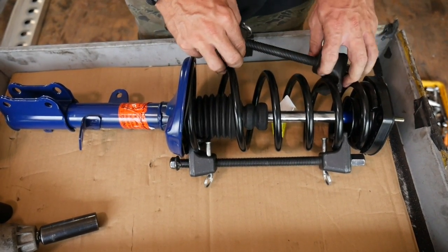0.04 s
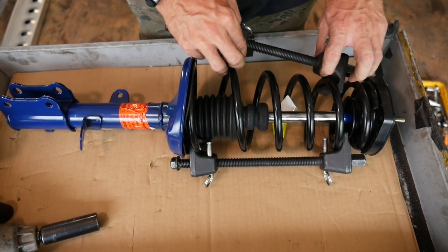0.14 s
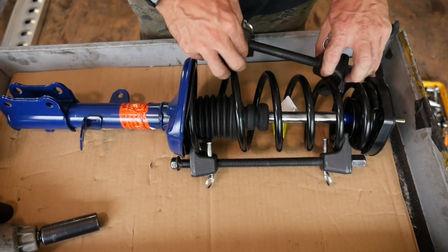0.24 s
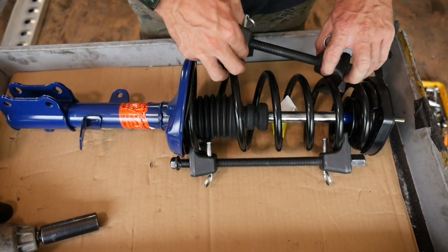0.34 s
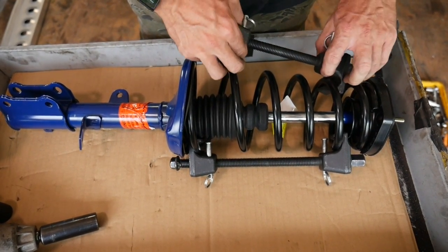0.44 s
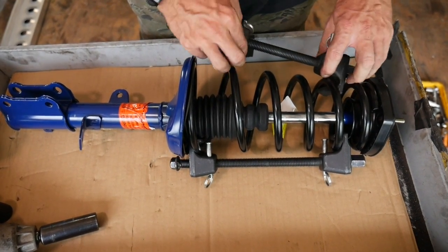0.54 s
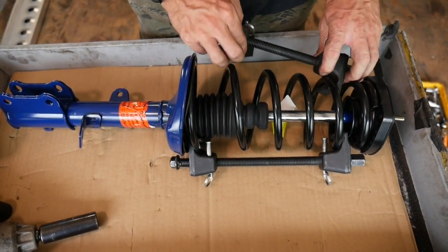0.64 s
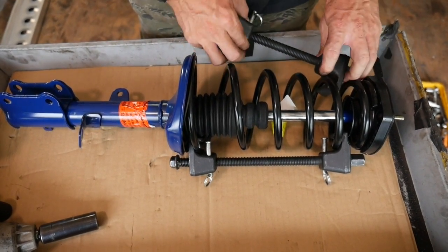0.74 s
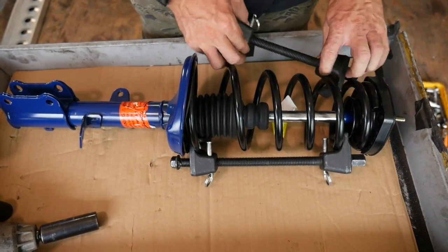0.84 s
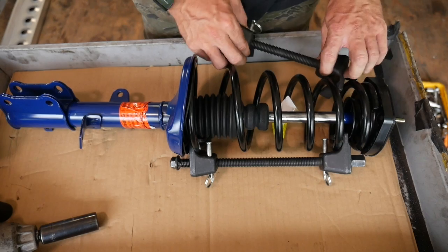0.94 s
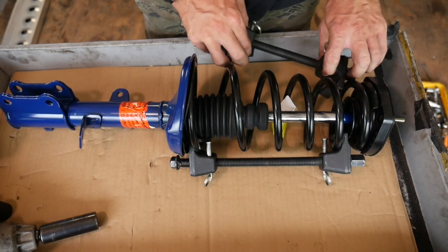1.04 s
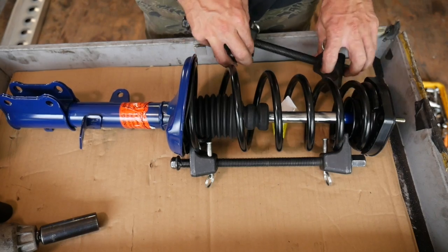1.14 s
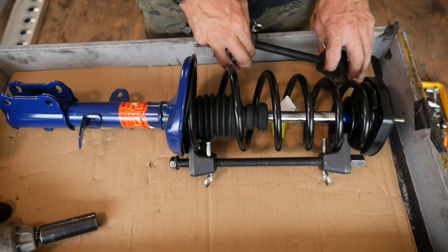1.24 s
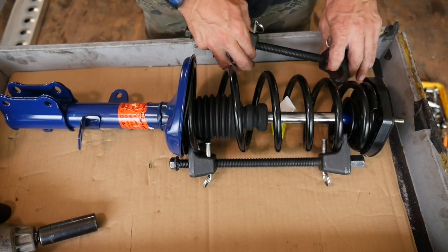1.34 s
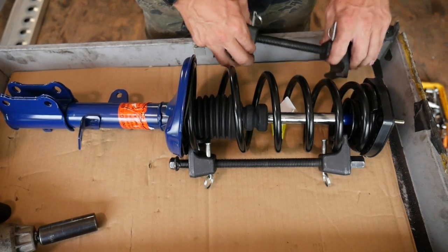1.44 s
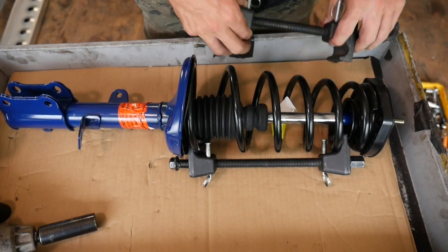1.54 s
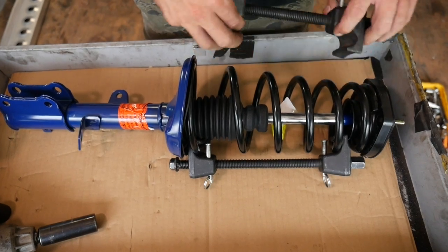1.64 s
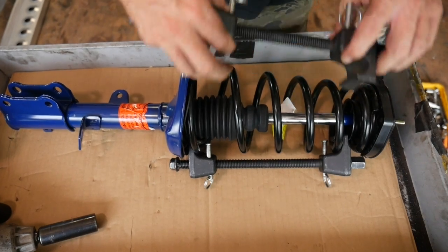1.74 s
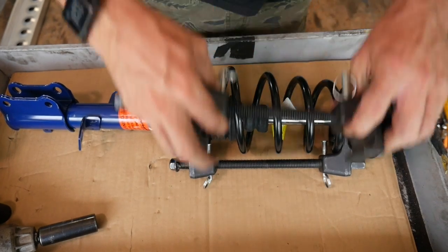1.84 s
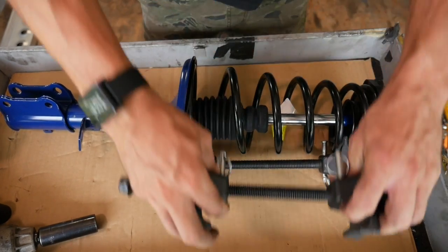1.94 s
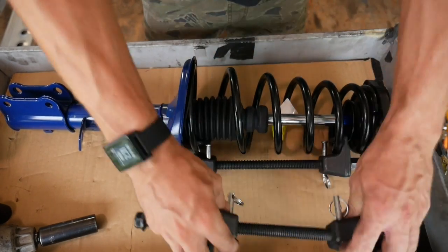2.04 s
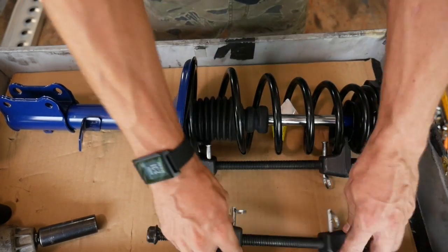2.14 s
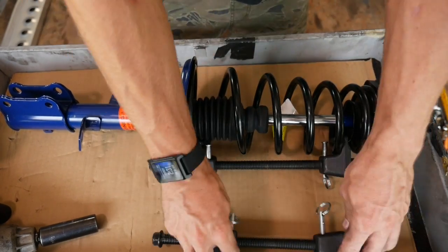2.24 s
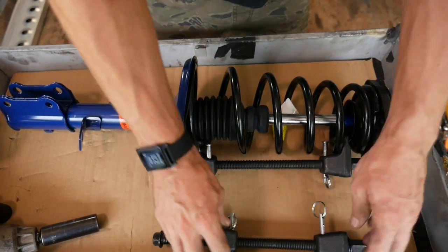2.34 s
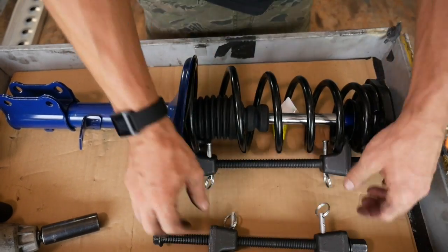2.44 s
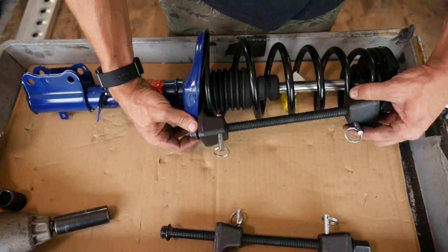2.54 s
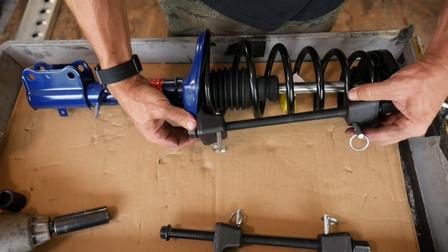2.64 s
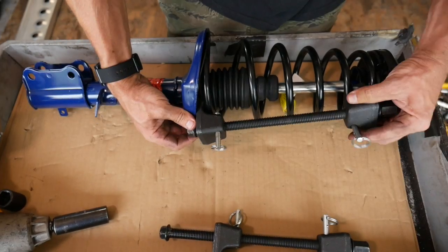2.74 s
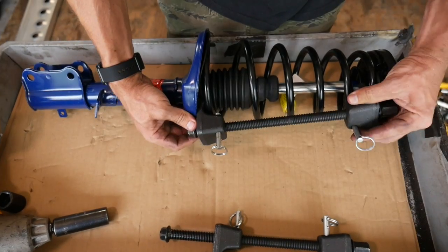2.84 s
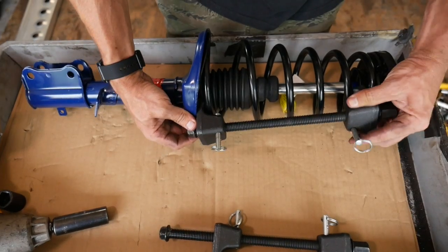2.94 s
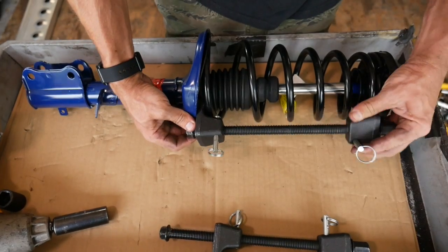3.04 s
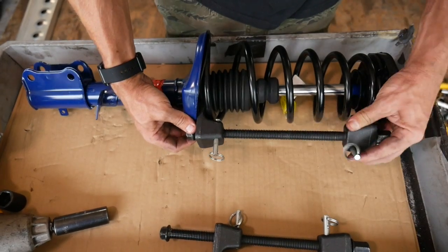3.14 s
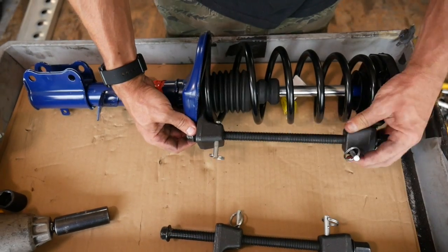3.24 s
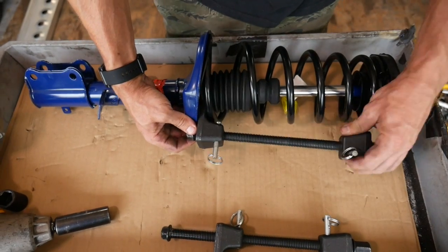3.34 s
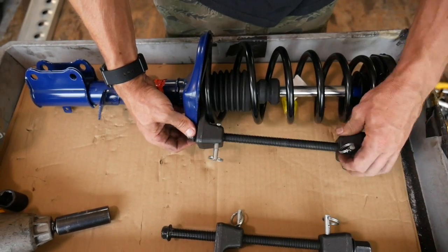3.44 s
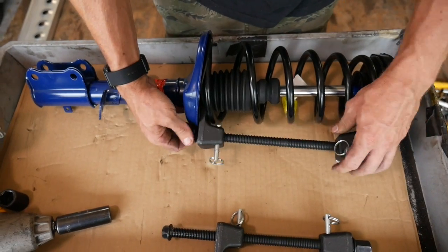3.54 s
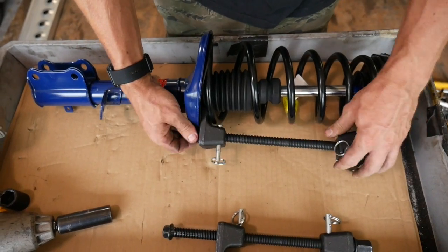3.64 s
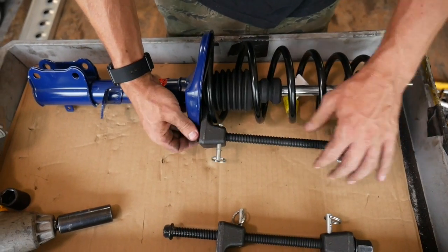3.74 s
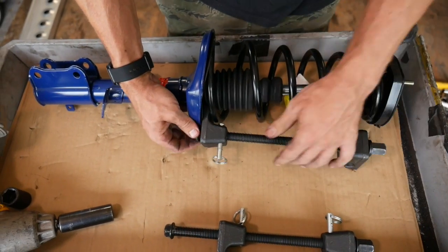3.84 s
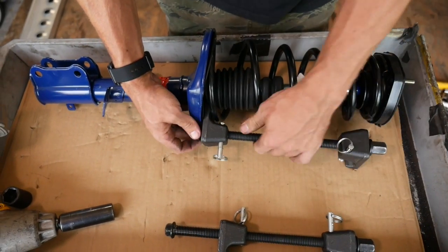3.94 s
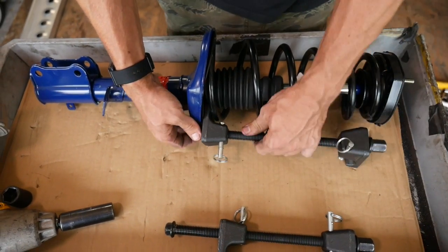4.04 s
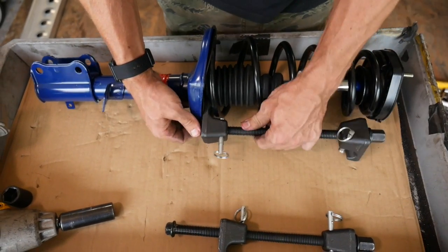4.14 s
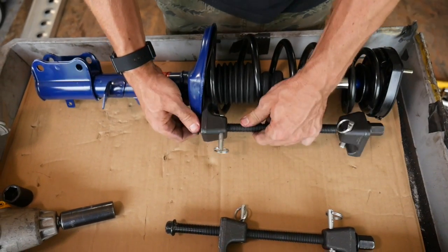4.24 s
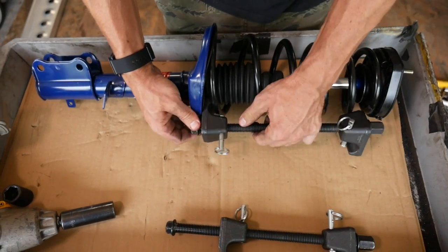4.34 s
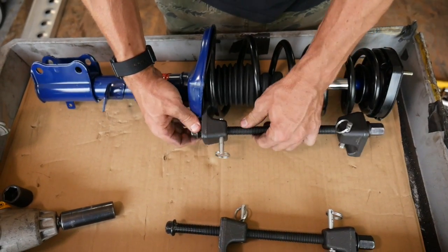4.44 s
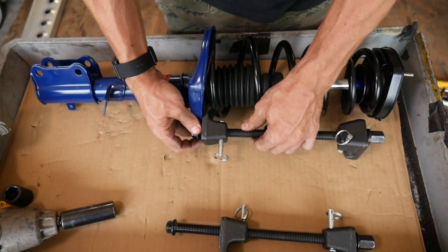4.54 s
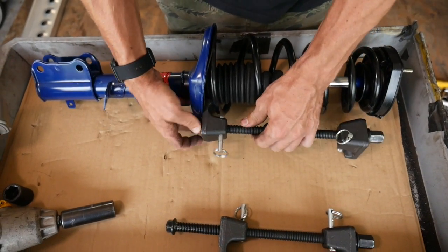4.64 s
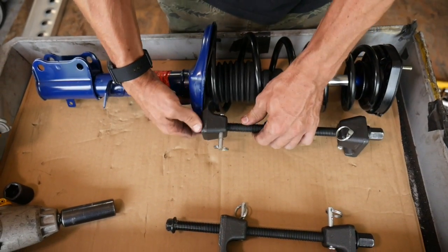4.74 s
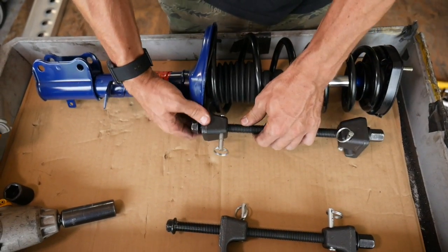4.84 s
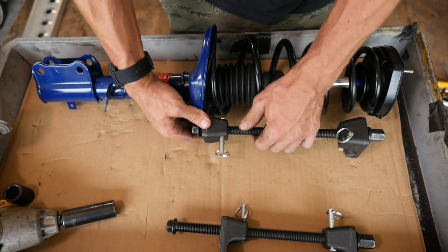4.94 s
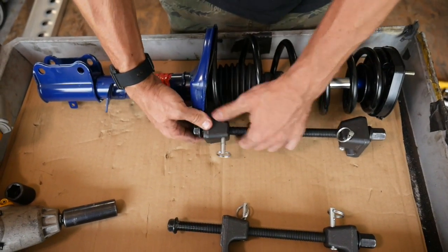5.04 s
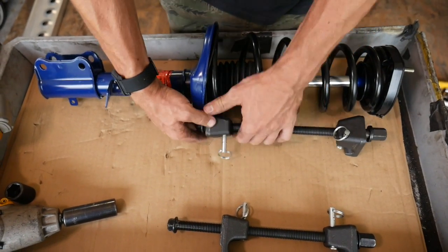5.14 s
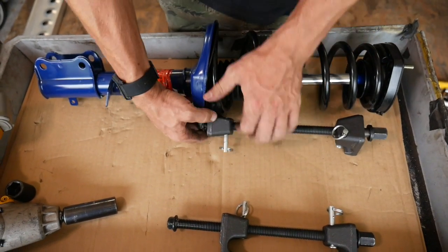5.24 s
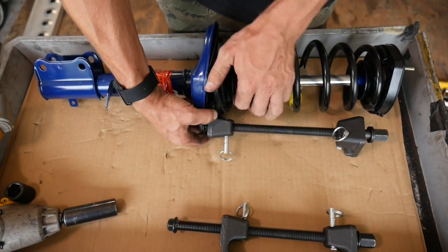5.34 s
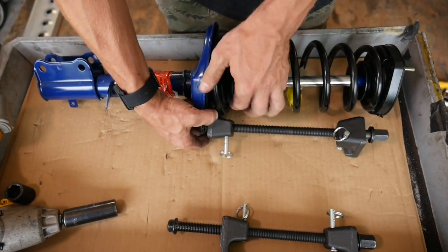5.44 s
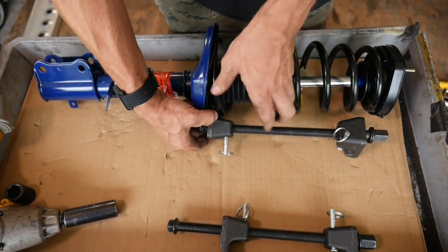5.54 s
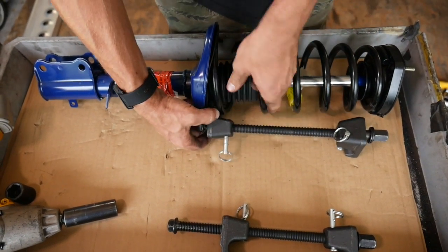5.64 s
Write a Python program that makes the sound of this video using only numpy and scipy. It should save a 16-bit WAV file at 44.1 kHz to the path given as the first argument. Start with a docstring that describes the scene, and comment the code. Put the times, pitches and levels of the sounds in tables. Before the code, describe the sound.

Steel clinks and dull metal knocks in a quiet workshop, one heavy clanking thud as a tool lands in a tray, then lighter handling and scrapes.

```python
"""The workshop hums faintly over steady air noise, and a bird outside gives one falling call near the start.
Steel spring compressors are unhooked from a coil spring and laid in a cardboard-lined sheet-metal tray.
Struck steel and castings ring as decaying modes, the tray thuds, and drags and slides are dense grains.
The heaviest blow lands at about 2.3 s and the recorder's gain ducks after it; more clinks, knocks
and short scraping slides follow to the end."""
import sys
import numpy as np
from scipy import signal
from scipy.fft import rfft, irfft
from scipy.io import wavfile
from scipy.ndimage import minimum_filter1d

SR = 44100
rng = np.random.default_rng(int(sys.argv[2]) if len(sys.argv) > 2 else 0)


def unload_audio(sound):
    """Save the sound as a 16-bit wav file, at the path given as the first command line argument."""
    columns = np.transpose(np.atleast_2d(sound))
    # keep every value between -1 and 1, then stretch to whole-number steps
    steps = np.round(np.clip(columns, -1, 1) * 32767)
    wavfile.write(sys.argv[1], SR, steps.astype(np.int16))


def invert_db(level):
    """Linear amplitude ratio for a level in decibels (20 dB per decade), elementwise."""
    return 10 ** (np.asarray(level, dtype=float) / 20)


N = 251633  # length in samples

# spectrum of the workshop air: (frequency [Hz], relative density [dB per Hz])
AIR_SPECTRUM = [(12, -2), (20, -2.5), (111, -13), (147, -9.5), (169, -8.5), (281, -4.5), (351, -8),
                (382, -18), (416, -13), (1280, -21.5), (1560, -26), (3140, -30), (3940, -30.5),
                (14700, -34.5), (15700, -41), (16000, -70)]
# likeness of the air in the two ears: (frequency [Hz], left-right likeness [0 to 1])
EAR_LIKENESS = [(60, 0.77), (180, 0.71), (550, 0.56), (1650, 0.75), (4970, 0.034), (15000, 0.029)]
# lines of a mains-driven machine: (frequency [Hz], rms level [dB])
HUM_LINES = [(118.4, -69), (199.2, -66), (236.9, -62), (269.2, -63.5), (355.3, -64.5), (414.5, -70.5),
             (473.7, -75.5), (592.2, -74.5), (651.4, -72.5), (882.9, -78), (1007, -78), (1244, -79.5)]
# faint narrow whines: (start [s], end [s], frequency [Hz], level [dB])
WHINES = [(0, .6, 1310, -74), (0, .6, 3200, -75), (1.05, 1.145, 2980, -64), (1.2, 1.42, 3100, -72)]
# hands at work: (time [s], drag of steel [dB], load shifting in the tray [dB])
HANDS = [(0.9, -90, -62), (1.13, -75, -61), (1.34, -66, -56.5), (1.55, -79, -80), (2.05, -96, -80),
         (2.21, -60.5, -62), (2.5, -81, -54.5), (2.6, -56, -50), (2.75, -65.5, -69), (3.07, -63, -46.5),
         (3.25, -70, -60), (3.5, -67.5, -49), (3.68, -85, -71), (3.95, -71, -76), (4.09, -71, -49.5),
         (4.3, -71.5, -61), (4.68, -68.5, -54.5), (4.86, -72, -54.5), (5.09, -70.5, -59),
         (5.2, -46.5, -47.5), (5.43, -94, -47.5), (5.57, -68, -59.5), (5.7, -88, -64)]
# grain colour of dragged steel: (frequency [Hz], relative density [dB per Hz])
DRAG_SPECTRUM = [(700, -21), (1200, -6), (1450, -0.5), (1650, 1.5), (1930, -7), (2500, -12.5), (3300, -7.5),
                 (4200, -4), (5400, -9.5), (9600, -15), (14500, -15.5), (16000, -33)]
# what lingers after a blow, one pair each: (level against the blow [dB], t60 [s])
RATTLE_AFTER_KNOCK = (-35, 0.29)
JANGLE_AFTER_CLINK = (-46.5, 0.42)
RUSTLE_AFTER_SLAP = (-24.5, 0.19)
MURMUR_AFTER_THUD = (-18, 0.26)
# weight landing in the tray:
# (time [s], strength before trim [dB], favoured pitch [Hz], cardboard slap against the strength [dB])
THUDS = [(0.147, -44, 146, -7), (0.283, -46, 148, -5), (0.414, -41.5, 156, -11), (0.579, -37.5, 139, -17),
         (0.697, -41, 144, -6), (0.759, -37.5, 146, -29), (0.936, -35, 161, -30),
         (1.151, -22.5, 168.6, -18), (1.201, -41, 185, -16), (1.224, -30.5, 215, -3.5),
         (1.369, -30, 220, -3.5), (1.399, -40.5, 153, -9), (2.233, -11.5, 217, -2), (2.249, -17.5, 148, -9),
         (2.258, -9.5, 250, -15), (2.29, 1.5, 214, -25), (2.815, -37, 160.5, -6), (3.019, -36.5, 206, 1.5),
         (3.111, -18, 179, -3.5), (3.445, -40, 166, -16), (3.562, -35.5, 142, -2.5),
         (3.605, -26.5, 400, -6), (3.712, -39, 160, -2), (4.108, -39, 158, -23), (4.249, -33.5, 252, -21),
         (4.376, -26.5, 139, -1.5), (4.397, -22.5, 246, -13), (4.571, -35, 167, -4),
         (4.727, -31.5, 176, -5.5), (4.759, -27, 299, -10), (4.874, -30.5, 238, -35), (5.149, -37, 146, 0),
         (5.219, -19, 254, -5), (5.272, -24.5, 310, -4.5), (5.324, -18, 276, -19.5), (5.36, -34, 225, -2.5),
         (5.415, -28, 223, -28), (5.443, -23.5, 265, -17), (5.59, -33, 250, -34), (5.62, -29, 414, -31),
         (5.676, -28, 254, -30)]
# modes of the sheet-metal tray: (frequency [Hz], relative level [dB], t60 before damping [s])
TRAY_MODES = [(97.7, -11, 0.04), (148, 3.5, 0.25), (171.7, 3.5, 0.21), (222.3, 0.5, 0.072),
              (247.6, -0.5, 0.32), (279.2, 7.5, 0.057), (370, -18.5, 0.032), (396, 2.5, 0.1),
              (569, -12.5, 0.2)]
# the bird's glide: (time [s], frequency before tremble [Hz], level before trim [dB])
BIRD_GLIDE = [(0.243, 5890, -56), (.285, 5600, -53), (.295, 5100, -74), (.312, 4900, -48.5),
              (.32, 4570, -59), (.35, 4480, -50.5), (.385, 4010, -57.5), (.395, 3830, -57),
              (.46, 3753, -67)]
# bright steel on steel: (time [s], tick strength before scatter [dB], favoured pitch [Hz],
# free ring against the tick before trim [dB], contact time scale [ms])
CLINKS = [(0.6324, -42, 4100, -30, 3.4), (0.6414, -32, 7950, -19, 4.2), (1.0545, -29, 12900, 6, 4.4),
          (1.1469, -13.5, 6740, -10, 0.8), (1.2002, -34, 3040, -7, 3), (1.2227, -31.5, 4200, -30, 2.6),
          (1.2497, -31.5, 9600, -29, 2.5), (1.3743, -35.5, 2970, -5, 4.3), (1.8656, -21, 9260, -15, 2.2),
          (2.03, -38.5, 9900, 0, 2.2), (2.061, -35, 9500, 3, 4.1), (2.1906, -40, 4960, -4, 7),
          (2.222, -40, 3030, -7, 8.3), (2.2306, -12.5, 5050, -11, 8.2), (2.2364, -13.5, 4030, -33, 2.4),
          (2.2568, -29, 5140, 8, 6), (2.263, -25, 3020, 2, 4.2), (2.2829, -21, 2850, -10, 13),
          (2.2907, -9, 6770, -25.5, 11), (2.2952, -1, 10200, -25, 5.4), (2.3, -5, 3440, -30, 0.94),
          (2.322, -28.5, 9100, 4, 6), (2.4253, -25.5, 9130, -3, 1.9), (2.7188, -34.5, 3560, -16, 8.9),
          (2.914, -51, 3800, 9, 5.4), (2.929, -42, 3000, -12, 2.3), (2.9954, -42, 9500, -4, 32),
          (3.0215, -38, 3700, 5, 11), (3.089, -29, 3640, 7, 9.1), (3.0973, -28.5, 3500, -4, 18),
          (3.1125, -11, 7200, -20, 19), (3.1173, -13.5, 4300, -4, 5.3), (3.1263, -22, 3970, -30, 3),
          (3.2309, -24, 5300, -16, 7.3), (3.3074, -34.5, 10800, -22, 17), (3.456, -28, 4200, 3, 28),
          (3.478, -33, 4080, -20, 10), (3.5229, -28, 8500, -26, 2.9), (3.5558, -33, 3100, -19, 4.9),
          (3.6091, -10, 9350, -5, 4.3), (3.7046, -34, 3950, -1, 17), (3.7204, -38, 5030, -5, 9),
          (4.1003, -16, 4960, -8.5, 8.7), (4.1064, -23, 4870, -32, 13), (4.157, -29.5, 9350, -18, 11),
          (4.1905, -29.5, 7800, -10, 4.5), (4.368, -47, 10600, -6, 5.4), (4.413, -41, 3440, -26, 6),
          (4.4428, -44, 3090, -5, 5.5), (4.485, -42, 10700, -4, 5), (4.519, -41, 3300, -20, 5),
          (4.605, -44, 4400, -10, 9), (4.7125, -23.5, 3400, -21, 4.2), (4.75, -29.5, 9140, 0.5, 13),
          (5.1687, -29.5, 3070, -15, 6.3), (5.2137, -16, 6300, 1, 3.3), (5.2299, -17, 3980, 3, 14),
          (5.2417, -29, 6700, 16.5, 9.9), (5.257, -21, 4950, -14, 13), (5.3965, -39, 8750, -30, 6.9),
          (5.4217, -36.5, 8700, -28, 6.7), (5.603, -32, 5700, -26, 1.9), (5.6964, -32, 4000, 2, 1.7)]
# modes of rods and spring: (frequency [Hz], relative level [dB], t60 before damping [s])
STEEL_MODES = [(3030, 0, .05), (3500, -3, .025), (3850, -2, .025), (4400, -2, .03), (4950, 0, .05),
               (5700, -6, .025), (6400, -6, .025), (7250, -1, .06), (7800, -6, .03), (9090, 2, .065),
               (9400, -3, .035), (9870, -3, .05), (10590, 3, .055), (12000, 2, .045), (12870, 2, .05)]
# a loose locking pin tinkles: (time [s], strength [dB])
PIN_TINKS = [(2.428, -46.5), (3.565, -55), (5.393, -52), (5.421, -51)]
# dull blows of the cast hooks:
# (time [s], strength before trim [dB], favoured pitch [Hz], contact time scale [ms])
KNOCKS = [(0.931, -39.5, 1160, 5.2), (1.144, -14, 1540, 9.2), (1.15, -24.5, 840, 9), (1.222, -39, 636, 15),
          (1.359, -42, 960, 8.5), (1.374, -24.5, 1450, 3.1), (1.864, -41, 1760, 7.5),
          (2.19, -40, 1540, 4.3), (2.221, -32.5, 2220, 4.1), (2.23, -13.5, 1470, 11),
          (2.246, -21.5, 950, 3.4), (2.279, -28, 1624, 3.4), (2.291, -11, 592, 3.6), (2.294, 4, 2190, 4.5),
          (2.418, -35.5, 2300, 7.9), (2.707, -36.5, 1650, 25), (2.763, -54, 1500, 4.4),
          (2.85, -37.5, 1770, 11), (2.876, -44, 2430, 5), (2.992, -36.5, 1840, 15), (3.025, -31, 870, 11),
          (3.091, -16, 2630, 20), (3.114, -10, 2730, 1.7), (3.118, -9.5, 2500, 14),
          (3.449, -23.5, 1720, 2.7), (3.478, -18.5, 1535, 2.1), (3.554, -30, 1620, 5.5),
          (3.607, -17, 1430, 3.3), (3.707, -35.5, 1550, 7.7), (3.717, -29.5, 1600, 12.5),
          (3.888, -34, 1375, 7.7), (4.057, -36.5, 567, 4.6), (4.101, -27.5, 1280, 15),
          (4.11, -24, 1890, 11), (4.365, -14, 1505, 11.3), (4.379, -30, 1450, 2.9), (4.444, -30, 1500, 9),
          (4.483, -14, 1450, 3.6), (4.518, -39, 624, 5), (4.563, -29, 1680, 6), (4.602, -30, 1490, 8.7),
          (4.689, -40, 2040, 15), (4.712, -29.5, 1420, 5), (5.1, -37, 1570, 3.2), (5.152, -37, 1770, 5),
          (5.233, -15, 1970, 11), (5.265, -21, 1390, 6.5), (5.35, -34, 638, 2.2), (5.393, -30.5, 940, 4.3),
          (5.446, -29, 1300, 6.4), (5.617, -38, 735, 4.9), (5.696, -31, 2040, 6.8)]
# modes of the cast hooks: (frequency [Hz], relative level [dB], t60 before damping [s])
HOOK_MODES = [(740, 2, .07), (940, 0, .035), (1150, 0, .025), (1450, 0, .035), (1560, 0, .03),
              (1800, 0, .03), (2100, 0, .03), (2350, 0, .025), (2620, 0, .035)]
# the threaded rod rings out of the hand: (time [s], strength per mode before mode weights [dB])
ROD_RINGS = [(2.243, -51), (2.258, -28), (4.367, -63), (5.215, -33), (5.243, -27), (5.258, -62)]
# the rod's share of the steel modes: (frequency [Hz])
ROD_HZ = (3030, 4950, 7250, 9870, 10590, 12000, 12870)
# a hook slides along steel:
# (start [s], end [s], level at the start [dB], level at the end [dB], share of the upper rasp [dB])
SLIDES = [(3.449, 3.504, -46, -62, 4.5), (3.694, 3.742, -55, -67, 3), (4.103, 4.261, -56, -56.5, 5),
          (4.585, 4.619, -64, -62, 7), (4.72, 4.834, -77, -63, 0.3)]
# resonances of the sliding rasp: (frequency [Hz], width [Hz], relative level [dB])
RASP_BANDS = [(1500, 350, -4), (1930, 300, 0), (4250, 900, 0), (8300, 2500, -12)]
# tilt between the ears: (frequency [Hz], left minus right [dB])
EAR_TILT = [(60, -2), (240, -1.5), (950, -2.5), (3770, 0), (15000, -3)]

TREBLE_OF_DRAG_DB, RUSTLE_OF_LOAD_DB = 1, -19.5
DRAG_OF_SLIDE_DB, TREBLE_OF_SLIDE_DB = 2.5, 2.5
STRAY_TICK_DB = -43  # before each tick's own luck, at a drag of -65 dB
CLINK_SCATTER_DB = 4  # left-right spread
GRIP = .35  # a hand on the steel cuts its ringing to this share
PIN_HZ, PIN_T60_S = 9050, 0.46


def in_time(rows, t):
    """Interpolate every column of a table over time."""
    s, *columns = np.transpose(rows)
    return [np.interp(t, s, column) for column in columns]


def at_hz(points, hz):
    """Read a spectral table on a log-frequency axis."""
    table_hz, values = np.array(points).T
    return np.interp(np.log(hz), np.log(table_hz), values)


def rms_one(x):
    """Level a signal to an rms of 1."""
    return x / np.sqrt(np.mean(x ** 2) + 1e-20)


def colour(x, spectrum):
    """Shape the last axis by a (frequency [Hz], level [dB]) table."""
    size = x.shape[-1]
    hz = np.fft.rfftfreq(size, 1 / SR) + 1
    return irfft(rfft(x) * invert_db(at_hz(spectrum, hz)), size)


def cut(x, hz, kind):
    """Second-order Butterworth filter, "low" or "high" pass."""
    sos = signal.butter(2, np.clip(hz, 10, SR / 2.2), kind, fs=SR, output="sos")
    return signal.sosfilt(sos, x)


def ring(push, hz, t60):
    """One decaying mode: a unit click sets a sine of height 1 ringing."""
    r = invert_db(-60 / (t60 * SR))
    w = 2 * np.pi * hz / SR
    return signal.lfilter([0, np.sin(w)], [1, -2 * r * np.cos(w), r * r], push + 1e-18)


def place(s, shapes):
    """Lay one short shape at each time."""
    at = np.round(s * SR).astype(int)[:, None] + np.arange(shapes.shape[1])
    return np.bincount(at.ravel(), shapes.ravel(), N + shapes.shape[1])[:N]


def strike(modes, s, shapes, blow_db, favoured_hz, fall_db, spread_db, lasting):
    """Each blow drives all modes, most those near the pitch its spot favours (fall_db an octave away)."""
    out = np.zeros(N)
    luck = rng.standard_normal((len(s), len(modes)))
    for k, (hz, db, t60) in enumerate(modes):
        octaves_off = np.abs(np.log2(hz / favoured_hz))
        gain = invert_db(blow_db + db - fall_db * octaves_off + spread_db * luck[:, k])
        out += (-1) ** k * ring(place(s, shapes * gain[:, None]), hz, t60 * lasting)
    return out


def chatter(ms, hz, fall_db):
    """Surfaces meet in rattling micro-impacts; returns pushes (energy 1) and direct sound (peak 1)."""
    t = np.arange(1500) / SR
    x = t / (np.clip(ms, .3, 30)[:, None] / 1000)
    noise = rng.standard_normal(x.shape) * np.minimum(t / 0.00032, 1) * np.exp(-2.0 * x ** 0.54)
    f = np.fft.rfftfreq(t.size, 1 / SR) + 1
    tint = invert_db(-fall_db * np.abs(np.log2(f / hz[:, None])))
    sound = irfft(rfft(noise) * tint, t.size)
    noise[:, 10] += 1.68 * np.linalg.norm(noise, axis=1)  # the first touch is one sharp click
    push = noise / np.linalg.norm(noise, axis=1, keepdims=True)
    return push, sound / np.abs(sound).max(axis=1, keepdims=True)


def linger(s, blow_db, after):
    """After each blow a level jumps up and dies away; powers add."""
    db, t60 = after
    power = place(s, invert_db(2 * (blow_db + db))[:, None])
    return np.sqrt(signal.lfilter([1], [1, -invert_db(-120 / (t60 * SR))], power + 1e-18))


def workshop_air():
    """Steady air noise, its left-right likeness set by frequency, plus a machine's fixed sine lines."""
    f = np.fft.rfftfreq(N, 1 / SR) + 1
    alike = np.clip(at_hz(EAR_LIKENESS, f), 0, 1)
    mid, side = rfft(rng.standard_normal((2, N))) * invert_db(at_hz(AIR_SPECTRUM, f))
    air = irfft(np.sqrt(1 + alike) * mid + np.sqrt(1 - alike) * side * [[1], [-1]], N)
    t = np.arange(N) / SR
    phases = rng.uniform(0, 2 * np.pi, len(HUM_LINES))
    hum = np.zeros(N)
    for (hz, db), phase in zip(HUM_LINES, phases):
        hum += np.sqrt(2) * invert_db(db) * np.sin(2 * np.pi * hz * t + phase)
    return invert_db(-53.5) * rms_one(air) + hum


def whines():
    """Noise in a narrow resonance, fading in and out."""
    t = np.arange(N) / SR
    out = np.zeros(N)
    for start, end, hz, db in WHINES:
        on = np.clip(np.minimum(t - start + 0.0093, end - t) / 0.019, 0, 1)
        out += invert_db(db) * on * rms_one(ring(rng.standard_normal(N), hz, 0.017))
    return out


def handling_levels():
    """Gains of drag, its treble, rustle and murmur: the hands, the slides and what lingers after blows."""
    drag, load = invert_db(in_time(HANDS, np.arange(N) / SR))
    slide = sum(slide_levels())
    thud_s, thud_db, _, slap_db = np.transpose(THUDS)
    knock_s, knock_db = np.transpose(KNOCKS)[:2]
    clink_s, clink_db = np.transpose(CLINKS)[:2]
    rattle = linger(knock_s, knock_db, RATTLE_AFTER_KNOCK)
    jangle = linger(clink_s, clink_db, JANGLE_AFTER_CLINK)
    drag_gain = drag + invert_db(DRAG_OF_SLIDE_DB) * slide + rattle
    treble_gain = invert_db(TREBLE_OF_DRAG_DB) * drag + invert_db(TREBLE_OF_SLIDE_DB) * slide + jangle
    rustle_gain = invert_db(RUSTLE_OF_LOAD_DB) * load + linger(thud_s, thud_db + slap_db, RUSTLE_AFTER_SLAP)
    murmur_gain = load + linger(thud_s, thud_db, MURMUR_AFTER_THUD)
    return drag_gain, treble_gain, rustle_gain, murmur_gain


def handling():
    """Dragged steel sheds dense clicks into its modes; shifting weight rustles card and murmurs the tray."""
    drag_gain, treble_gain, rustle_gain, murmur_gain = handling_levels()
    grains = (rng.random(N) < 6000 / SR) * rng.standard_normal((2, N))  # 6000 a second
    grains = grains * invert_db(1.6 * rng.exponential(1, N))  # a few far larger than the rest
    grains = grains[0] + 0.24 * grains[1] * [[1], [-1]]  # slightly wide
    rasp = colour(grains, DRAG_SPECTRUM)
    low = cut(cut(rasp, 4940, "low"), 4940, "low")
    jangle = sum(ring(grains[0], hz, t60) * invert_db(db) for hz, db, t60 in STEEL_MODES if hz > 5500)
    high = cut(cut(rasp, 9700, "high"), 5344, "high")
    treble = rms_one(high) + invert_db(-16.0) * rms_one(jangle)
    fibres = (rng.random(N) < 700 / SR) * rng.standard_normal(N)  # 700 a second
    rustle = rms_one(cut(cut(cut(fibres, 840, "high"), 840, "high"), 1000, "low"))
    push = rng.standard_normal(N)
    creep = sum(rms_one(ring(push, hz, t60)) * invert_db(db) for hz, db, t60 in TRAY_MODES)
    murmur = rms_one(cut(creep, 130, "high"))
    steel = drag_gain * rms_one(low) + treble_gain * treble
    return steel + rustle_gain * rustle + murmur_gain * murmur


def thuds():
    """Cardboard softens each landing to a push of a few ms; a sharper slap wakes the upper modes."""
    s, db, hz, slap_db = np.transpose(THUDS)
    bump = np.hanning(130)
    push = bump / bump.sum() * np.ones((len(s), 1))
    _, slap = chatter(np.full(len(s), 22.0), np.full(len(s), 480.0), fall_db=6.5)
    upper = strike(TRAY_MODES[-2:], s, push, db + slap_db - 4.0, 405.0,
                   fall_db=21.0, spread_db=2.5, lasting=0.99)
    noise = place(s, slap * invert_db(db + slap_db - 0.5)[:, None])
    noise = cut(cut(noise, 200, "high"), 230, "high")
    body = strike(TRAY_MODES, s, push, db - 3.5, hz, fall_db=29.5, spread_db=1, lasting=0.9)
    return body + upper + noise


def bird():
    """A falling, breathy whistle: a sine with a randomly trembling pitch, smeared by outdoor echoes."""
    t = np.arange(N) / SR
    hz, db = in_time(BIRD_GLIDE, t)
    on = np.clip(np.minimum(t - BIRD_GLIDE[0][0], BIRD_GLIDE[-1][0] - t) / 0.011, 0, 1)
    tremble = 1 + .018 * rms_one(cut(rng.standard_normal(N), 120, "low"))
    call = np.sqrt(2) * on * invert_db(db) * np.sin(2 * np.pi * np.cumsum(hz * tremble) / SR)
    lag = np.arange(int(.4 * SR)) / SR
    echoes = rng.standard_normal((2, lag.size)) * invert_db(-60 * lag / 0.43) * invert_db(-32.5)
    return invert_db(-6.5) * call + signal.fftconvolve(call[None], echoes, axes=1)[:, :N]


def stray_clinks(count=60):
    """Faint touches at random moments, mostly heard while steel is dragged; rows like CLINKS."""
    luck = rng.random((count, 3))
    s = luck[:, 0] * (N / SR - .05)
    drag_db = in_time(HANDS, s)[0]
    db = STRAY_TICK_DB + (drag_db + 65) - 3.0 * np.log(luck[:, 1] + 0.054)
    hz = 3000 * 2.9 ** luck[:, 2]
    return np.transpose([s, db, hz, np.full(count, -14.0), np.full(count, 6.0)])


def clinks():
    """A tick coloured by the spot hit, a short ring of the held part, a thin free ring and the pin."""
    s, tick_db, hz, free_db, ms = np.vstack([CLINKS, stray_clinks()]).T
    pan_db = CLINK_SCATTER_DB * rng.standard_normal(len(s)) - 2.0  # leaning a little right
    push, sound = chatter(ms, hz, fall_db=2.5)
    ticks = [place(s, sound * invert_db(tick_db + side * pan_db / 2)[:, None]) for side in (1, -1)]
    held = strike(STEEL_MODES, s, push, tick_db - 13, hz, fall_db=24, spread_db=3, lasting=GRIP)
    free = strike(STEEL_MODES, s, push, tick_db + free_db - 4, hz, fall_db=45, spread_db=2, lasting=.75)
    pin_s, pin_db = np.transpose(PIN_TINKS)
    pin = ring(place(pin_s, invert_db(pin_db)[:, None]), PIN_HZ, PIN_T60_S)
    return cut(np.array(ticks), 2100, "high") + held + free + pin


def knocks():
    """Thick castings ring low and briefly under a burst of contact noise."""
    s, db, hz, ms = np.transpose(KNOCKS)
    push, sound = chatter(ms, hz, fall_db=6.0)
    contact = place(s, sound * invert_db(db - 8.0)[:, None])
    return contact + strike(HOOK_MODES, s, push, db - 4.5, hz, fall_db=24.0, spread_db=3, lasting=0.56)


def rod():
    """Struck near its end, the free rod sounds all its bending modes at once."""
    s, db = np.transpose(ROD_RINGS)
    modes = [mode for mode in STEEL_MODES if mode[0] in ROD_HZ]
    clicks = np.ones((len(s), 1))
    return strike(modes, s, clicks, db, 8000.0, fall_db=5.0, spread_db=0.0, lasting=1.66)


def slide_levels():
    """The gain of each slide in time: a ramp in dB that starts and stops dead."""
    t = np.arange(N) / SR
    gains = []
    for start, end, from_db, to_db, _ in SLIDES:
        on = np.clip(np.minimum(t - start, end - t) / 0.0027, 0, 1)
        gains.append(on * invert_db(np.interp(t, [start, end], [from_db, to_db])))
    return gains


def slides():
    """Stick-slip grains in broad resonances, stopping dead."""
    grains = (rng.random(N) < 3000 / SR) * rng.standard_normal(N)  # 3000 a second
    grains = grains * invert_db(1.05 * rng.exponential(1, N))
    bands = []
    for hz, width, db in RASP_BANDS:
        t60 = np.log(1000) / (np.pi * width)
        bands.append(invert_db(db) * rms_one(ring(grains, hz, t60)))
    lower, upper = sum(bands[:2]), sum(bands[2:])
    return sum(gain * (lower + invert_db(row[-1]) * upper) for gain, row in zip(slide_levels(), SLIDES))


def room(x, t60, treble_t60, early_db):
    """Near reflections off tray and hands, then a noise tail with its own decay for the treble."""
    lag = np.arange(int(.5 * SR)) / SR
    noise = rng.standard_normal((2, lag.size)) * np.clip(lag / 0.0039, 0, 1)
    low = cut(noise, 2100, "low")
    early = noise * invert_db(early_db - 60 * lag / 0.063)
    tail = low * invert_db(-60 * lag / t60) + (noise - low) * invert_db(-60 * lag / treble_t60)
    return signal.fftconvolve(x, tail + early, axes=1)[:, :N]


def scene():
    """The bench work with its ear differences and room, over bird, whines and workshop air."""
    bench = clinks() + knocks() + rod() + slides() + handling() + thuds()
    bench = cut(cut(bench, 39, "high"), 45, "high")  # a shallow tray radiates no deep bass
    bench = cut(bench, 9100, "low")  # the microphones roll the top off
    f = np.fft.rfftfreq(N, 1 / SR) + 1
    half_db = at_hz(EAR_TILT, f) / 2
    # the left port is a little further off: 22 microseconds
    delay = np.exp(-2j * np.pi * f * [[22e-6], [0]])
    near = irfft(rfft(bench) * invert_db([half_db, -half_db]) * delay, N)
    walls = invert_db(-48.5) * room(cut(bench, 640, "high"), t60=0.37, treble_t60=0.39, early_db=4.5)
    return near + walls + bird() + whines() + workshop_air()


def low_pass(x):
    """Removes everything above the highest recorded frequency."""
    return signal.sosfilt(signal.butter(12, 16990, fs=SR, output="sos"), x)


def record(dry):
    """Gain control: loud peaks pull the gain down, it holds a moment and then springs back."""
    peak_db = 20 * np.log10(np.abs(dry).max(axis=0) + 1e-9)
    over_db = np.maximum(peak_db + 9.8, 0)  # excess above -9.8 dB
    hold = int(.29 * SR) | 1  # odd number of samples, looking back
    gain_db = minimum_filter1d(-.6 * over_db, hold, origin=hold // 2)
    r = np.exp(-1 / (0.0013 * SR))  # 1.3 ms smoothing
    gain_db = signal.lfilter([1 - r], [1, -r], gain_db)
    return low_pass(dry * invert_db(gain_db))


dry = scene()
out = record(dry)
unload_audio(out)
```